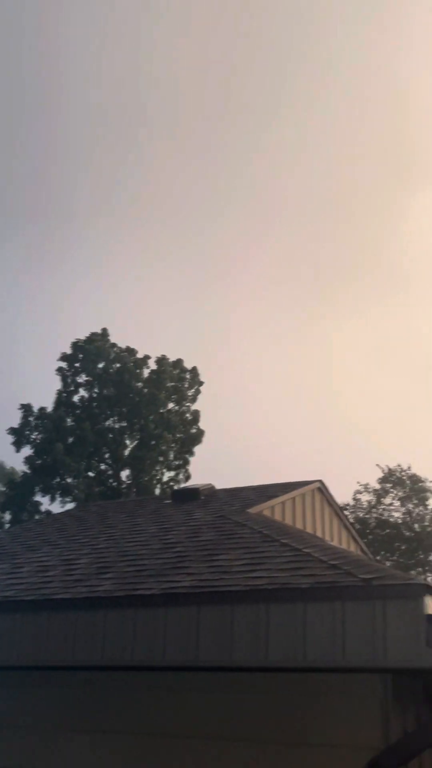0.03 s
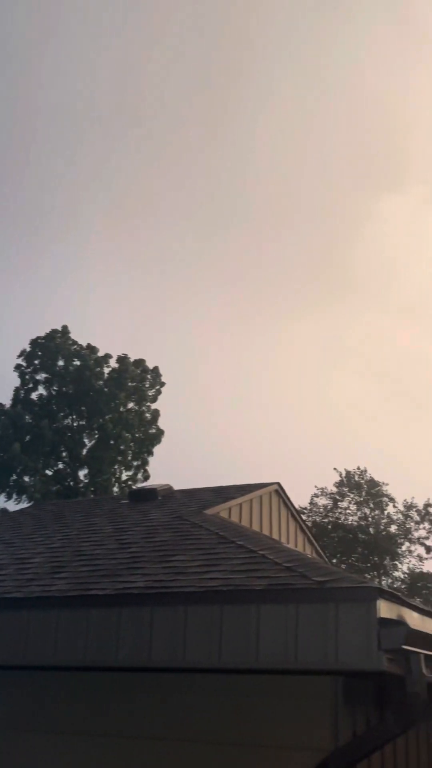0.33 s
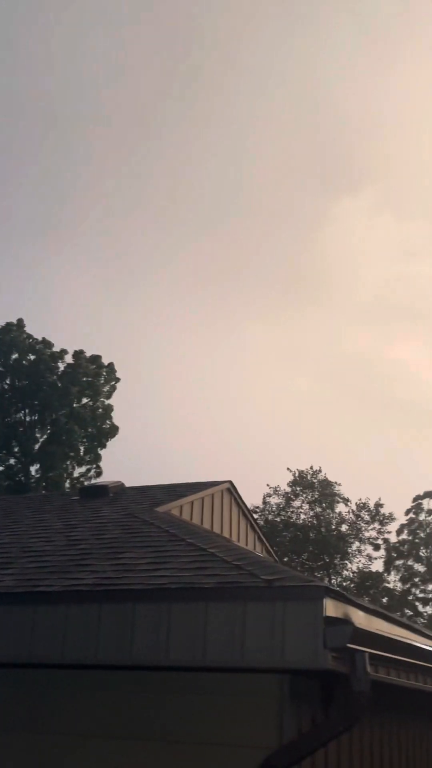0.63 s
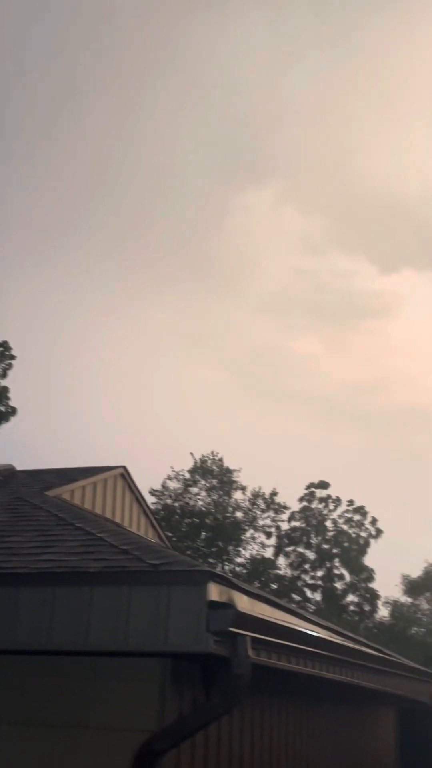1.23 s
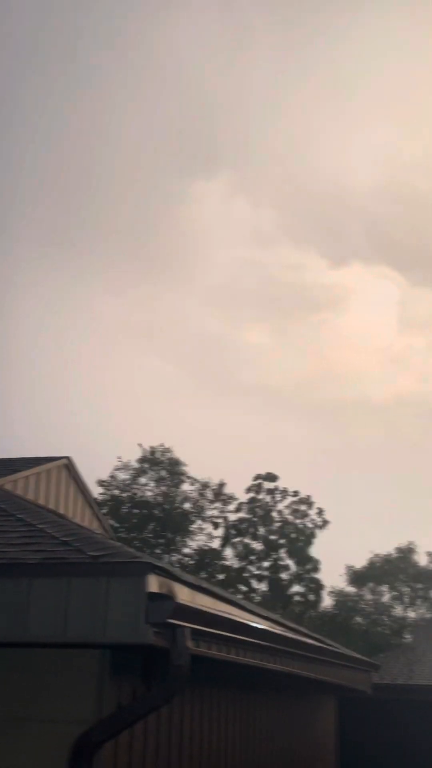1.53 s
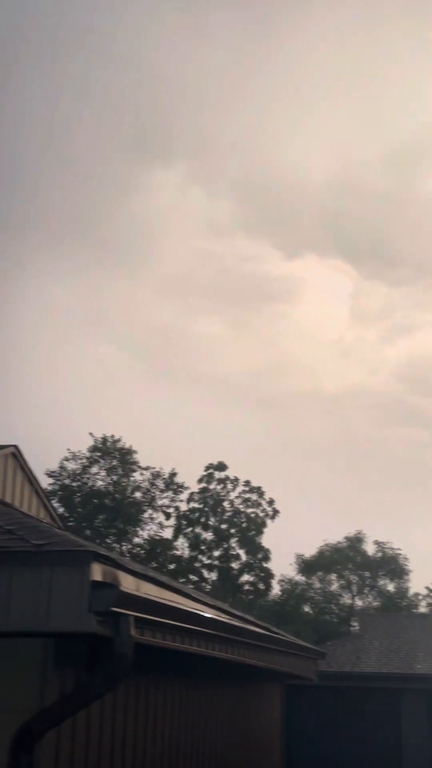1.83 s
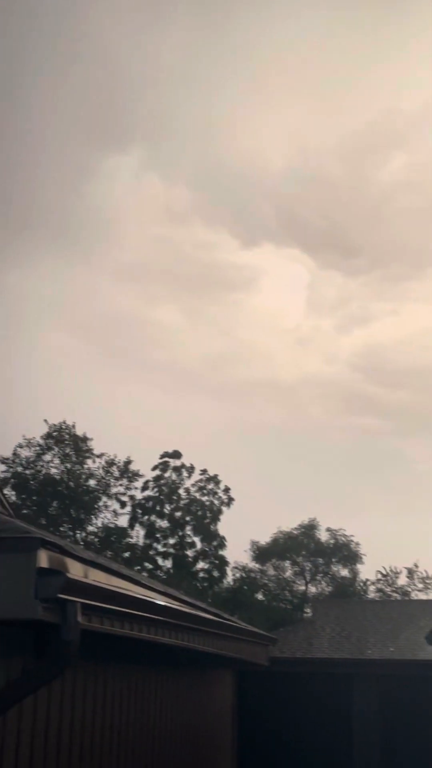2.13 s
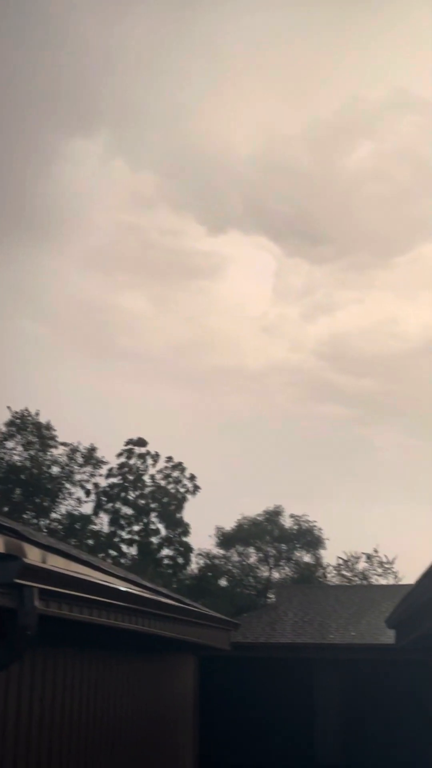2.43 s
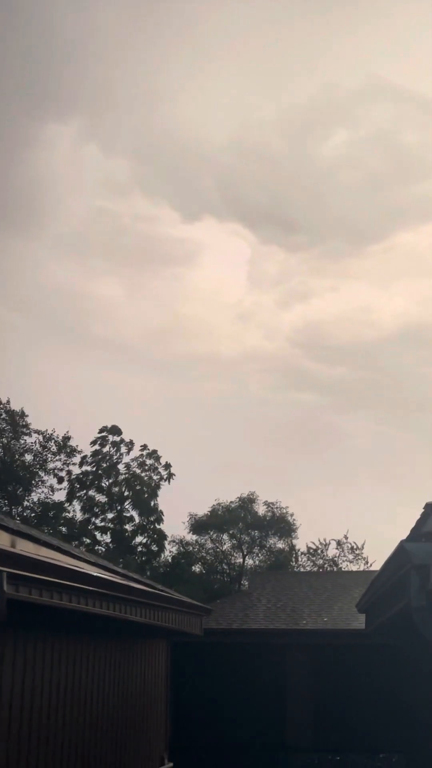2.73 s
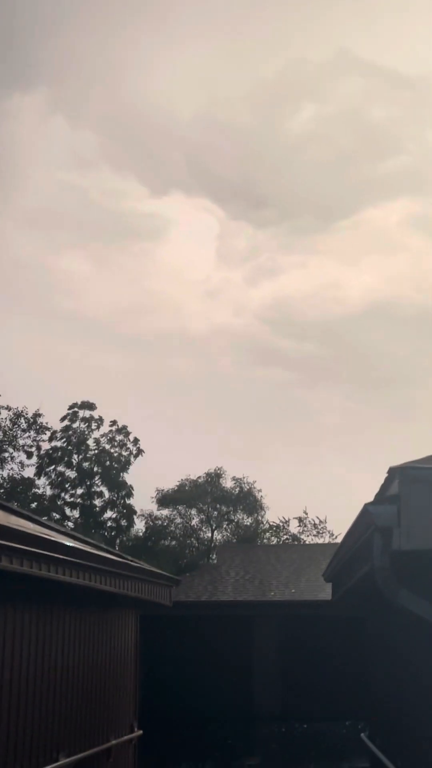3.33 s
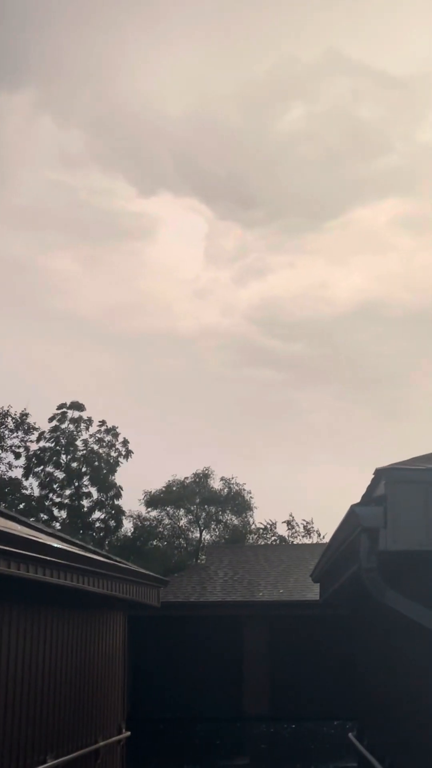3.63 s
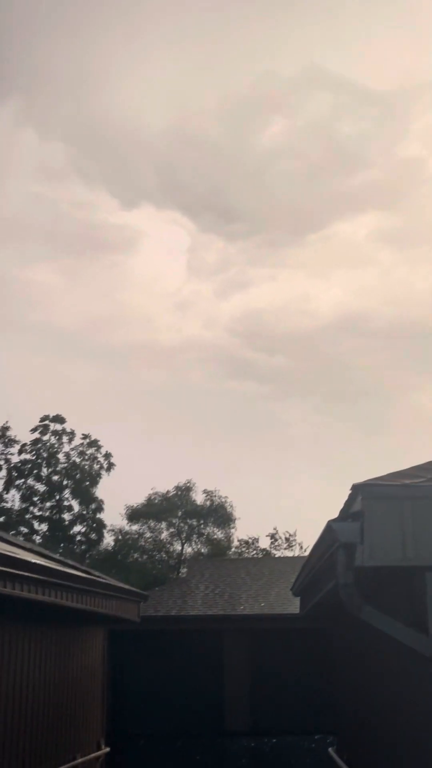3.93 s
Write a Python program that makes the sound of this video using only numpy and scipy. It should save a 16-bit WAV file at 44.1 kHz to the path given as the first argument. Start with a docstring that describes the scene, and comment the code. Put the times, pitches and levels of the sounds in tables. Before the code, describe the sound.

Gusty wind rumbling low outdoors, with light rain pattering and a few drips.

```python
"""Light rain and gusty wind beside a house

A hollow rumble swells with the gusts, trees roar, and the wind moans once over a wash of far rain.
Small drops patter and spray, near ones snap on hard surfaces, and drips ring a gutter. A far bird
gives short raspy calls made of narrow noise. Walls and roofs scatter the drops, drips and calls."""
import sys
import numpy as np
from scipy import signal
from scipy.fft import rfft, irfft
from scipy.io import wavfile

SR = 44100
rng = np.random.default_rng(int(sys.argv[2]) if len(sys.argv) > 2 else 0)


def transcribe(u):
    """Save the signal u as a 16-bit wav file named by the first command-line argument.

    u: samples, shape (n,) or (channels, n), limited to [-1, 1]; the rate is SR.
    q: integer samples, one column per channel.
    """
    v = np.clip(np.atleast_2d(u).T, -1, 1)
    q = np.round(v * 32767).astype(np.int16)
    wavfile.write(sys.argv[1], SR, q)


N = 176400
T = np.arange(N) / SR

# Tone of the distant rain. Each row: frequency in Hz, relative density in dB.
WASH_TONE = [(20, -4), (200, 0), (600, 0), (1000, 1), (1600, -1), (2200, -4), (3100, -6), (4800, -10),
             (8000, -12.5), (16000, -16)]
# Fader for the distant rain. Each row: time in seconds, level in dB.
WASH_FADER = [(0, -42), (1.4, -42), (2.3, -43.5), (4, -43)]
# Far bird calls. Each row: start in seconds, length in seconds, level in dB, top pitch in Hz.
BIRD_CUES = [(1.615, 0.041, -47, 1722), (2.725, 0.054, -50.5, 1790), (2.904, .075, -46.5, 1687),
             (3.049, 0.0575, -44, 1642), (3.386, .06, -47.5, 1680), (3.436, .07, -46, 1718),
             (3.703, 0.064, -45, 1727), (3.797, .04, -47, 2020)]
# Sizzle of the finest droplets. Each row: frequency in Hz, relative density in dB.
SPRAY_TONE = [(100, -50), (5000, -27), (8500, -12), (10500, 1), (12500, -4), (16000, -3)]
# Tone of the small drops. Each row: frequency in Hz, relative density in dB.
PATTER_TONE = [(100, -44), (1500, -12), (4000, 1), (8000, -2), (9600, -0.5), (11000, -2), (16000, -5)]
# Fader for the small drops. Each row: time in seconds, level in dB.
PATTER_FADER = [(0, -58), (0.9, -55.5), (1.45, -58), (1.8, -59), (2.25, -54), (2.6, -59), (4, -58.5)]
# Gutter drips. Each row: start in seconds, relative level in dB, pitch ratio.
DRIP_CUES = [(0.346, -38, 1.16), (1.35, -39.5, 1.2), (1.877, -42, 1.05), (2.6005, -36.5, 1.08),
             (2.906, -42, .92), (2.924, -42, 1.04), (3.399, -40.5, .9), (3.443, -40, 1.3),
             (3.462, -40.5, 1.15), (3.5345, -40.5, 0.88), (3.589, -34, 1.0), (3.8675, -37, 1)]
# The gutter's ring. Each row: frequency in Hz, relative level in dB, seconds to fall 60 dB.
GUTTER_MODES = [(1920, 2, .05), (2130, 5, 0.084), (2490, -4, 0.022), (3016, 6, 0.032), (3200, 4.5, 0.041),
                (3390, -7, 0.01)]
# A drip's wet splat. Each row: frequency in Hz, relative density in dB.
SPLAT_TONE = [(300, -25), (1500, -3), (3200, 7), (4500, -11), (12000, -12)]
# Near drops. Each row: start in seconds, relative level in dB, splash against the hit in dB.
TICK_CUES = [(0.029, -31, -2), (0.041, -34, -11), (0.4764, -18, -13), (0.4783, -17, -10),
             (0.798, -33.5, -3.5), (0.864, -29, -9), (0.972, -36.5, 0), (1.228, -48, -9),
             (1.351, -36.5, -0.5), (1.403, -35, 4.5), (1.519, -36, -2), (2.105, -34, -3), (2.239, -32, -6),
             (2.2543, -23.5, -16), (2.695, -31, -4), (3.055, -32, -2), (3.132, -45, -6), (3.252, -27.5, -9),
             (3.4425, -28, -13), (3.5333, -38, 7)]
# Bright snap of a near drop. Each row: frequency in Hz, gain in dB.
TICK_TONE = [(100, -37), (1500, -4), (4000, -6), (7000, -2), (9500, 0.5), (16000, -7)]
# Gusts that drive the rumble. Each row: time in seconds, relative level in dB.
GUST_FADER = [(0, -34.5), (0.2, -28), (0.34, -32), (0.56, -31), (0.66, -30), (0.8, -22), (0.88, -28.5),
              (1.3, -27.5), (1.65, -26.5), (1.8, -27.5), (2.05, -29), (2.18, -33), (2.36, -27), (2.6, -30),
              (2.92, -27.5), (3.1, -19.5), (3.25, -20.5), (3.4, -25.5), (3.6, -26.5), (3.75, -29),
              (4.0, -26.5)]
# Body of the wind. Each row: frequency in Hz, relative density in dB.
RUMBLE_TONE = [(20, -54), (30, -27), (42, -27.5), (54, -12), (80, -21), (110, -5.5), (160, -8),
               (200, -13.5), (300, -23), (600, -42.5), (2000, -92)]
# Hollow resonances in the rumble. Each row: frequency in Hz, width in Hz, relative level in dB.
HOLLOW_BANDS = [(95.13, 5.4, -8), (123.4, 5.7, -13), (151.2, 7, -13)]
# Swells of the deepest hollow. Each row: time in seconds, level in dB.
BOOM_FADER = [(0, -45), (0.2, -26), (0.37, -40.5), (0.55, -40), (0.66, -26), (0.85, -29), (1.05, -34),
              (1.22, -34), (1.45, -35.5), (1.65, -31), (1.8, -47), (2.03, -29.5), (2.17, -39.5),
              (2.33, -29), (2.55, -34), (2.88, -37), (3.08, -21.5), (3.27, -24.5), (3.42, -32),
              (3.8, -34.5), (4.0, -32.5)]
# Wind in the trees. Each row: frequency in Hz, relative density in dB.
ROAR_TONE = [(40, -26), (120, -13.5), (215, -2), (300, -8.5), (450, -12), (700, -23.5), (2000, -59)]
# Fader for the trees. Each row: time in seconds, relative level in dB.
ROAR_FADER = [(0, -48), (0.5, -50.5), (1.3, -48), (2.0, -44.5), (2.3, -39.5), (2.9, -44.5), (3.17, -42),
              (3.45, -42.5), (3.78, -43.5), (4.0, -43)]
# A moan that rises and sinks. Each row: time in seconds, pitch in Hz, level in dB.
MOAN_PATH = [(2.2, 205, -62), (2.55, 224, -38), (2.71, 246.2, -38.5), (2.82, 224, -31.5), (3.0, 213, -45),
             (3.5, 210.4, -48), (3.8, 208.6, -66)]
# Microphone colour. Each row: frequency in Hz, gain in dB.
MIC_EQ = [(20, 1.5), (8000, -1), (9200, -1), (10200, 2), (10800, 0.5), (11700, -9.5), (12700, -9),
          (14500, -5.5), (16000, -4.5)]

SNAP_DECAY_S = 0.00031  # one drop's impact, in both patter and ticks


def amp(db):
    """Decibels to gain."""
    return 10 ** (np.asarray(db) / 20)


def unit_rms(x):
    """Scales to rms 1."""
    return x / np.sqrt(np.mean(x ** 2) + 1e-20)


def curve(points, column=1):
    """Joins the points of a time table by straight lines."""
    rows = np.array(points)
    return np.interp(T, rows[:, 0], rows[:, column])


def colour(x, points):
    """Equalises x by a (Hz, dB) table."""
    f, db = np.transpose(points)
    hz = np.fft.rfftfreq(len(x), 1 / SR)
    gain = amp(np.interp(np.log(hz + 1), np.log(f), db))
    return irfft(rfft(x) * gain, len(x))


def noise(tone, length=N):
    """Noise of rms 1 with the given spectrum."""
    return unit_rms(colour(rng.standard_normal(length), tone))


def wander(rate_hz):
    """Random drift of rms 1, mostly slower than rate_hz."""
    hz = np.fft.rfftfreq(N, 1 / SR)
    spectrum = rfft(rng.standard_normal(N)) / (1 + (hz / rate_hz) ** 2)
    return unit_rms(irfft(spectrum * (hz > 0), N))


def whistle(hz, width_hz, steady=0):
    """A narrow band of noise around a pitch; steady (0-1) evens out its loudness."""
    flutter = wander(width_hz) + 1j * wander(width_hz)
    flutter = flutter / (abs(flutter) + .1) ** steady
    carrier = np.exp(2j * np.pi * np.cumsum(hz * np.ones(N)) / SR)
    return unit_rms((flutter * carrier).real)


def drop_bursts(per_s, spread_db, cap_db, decay_s):
    """Drops of uneven size land at random, each a dying burst of noise."""
    size = amp(np.minimum(spread_db * rng.exponential(1, N), cap_db))
    hits = size * (rng.random(N) < per_s / SR)
    envelope = signal.lfilter([1], [1, -np.exp(-1 / (SR * decay_s))], hits)
    return envelope * rng.standard_normal(N)


def add(mix, start, sound):
    """Lays a sound into the mix at start seconds."""
    part = mix[round(start * SR):][:len(sound)]
    part += sound[:len(part)]


def yard(x, wet_db, t60_s=0.22):
    """Adds a short scatter from walls and roofs."""
    t = T[:SR // 2]
    echoes = rng.standard_normal(len(t)) * (rng.random(len(t)) < .05)
    tail = echoes * np.exp(-np.log(1000) * t / t60_s)
    return x + amp(wet_db) * signal.fftconvolve(x, tail / np.linalg.norm(tail))[:N]


def wash(flicker_db=0.86, flicker_hz=14):
    """A bed of distant rain, flickering slightly, with a faint whine in it."""
    rain = noise(WASH_TONE) * amp(curve(WASH_FADER) + flicker_db * wander(flicker_hz))
    whine = amp(-64) * whistle(hz=946.5, width_hz=2.5, steady=0.29)
    return rain + whine


def bird(bend=.03, rasp_hz=103):
    """Short raspy notes with a slight pitch arch and a weak overtone."""
    level, pitch = np.zeros(N), np.zeros(N)
    for start, length, db, hz in BIRD_CUES:
        progress = np.clip((T - start) / length, 0, 1)
        arch = np.sqrt(np.maximum(np.sin(np.pi * progress), 0))
        level += amp(db) * arch
        pitch = np.where(T >= start, hz * (1 + bend * (arch - 1)), pitch)
    return level * (whistle(pitch, rasp_hz) + amp(-13.5) * whistle(2 * pitch, 2 * rasp_hz))


def spray():
    """Short, high fizzles where drops shatter."""
    fizz = drop_bursts(per_s=58, spread_db=8, cap_db=24, decay_s=0.0063)
    return amp(-59) * unit_rms(colour(fizz, SPRAY_TONE))


def patter(clump_db=2.5, clump_hz=12):
    """Many tiny impacts, swelling and thinning in clumps."""
    drops = drop_bursts(per_s=450, spread_db=9, cap_db=17.1, decay_s=SNAP_DECAY_S)
    clumps = amp(clump_db * wander(clump_hz))
    return amp(curve(PATTER_FADER)) * unit_rms(colour(drops * clumps, PATTER_TONE))


def drips(detune=.012, attack_s=0.0018, splat_decay_s=.007):
    """Each drip splats and rings the gutter briefly, at a slightly different spot."""
    out, t = np.zeros(N), T[:4096]
    attack = np.minimum(t / attack_s, 1)
    for start, db, ratio in DRIP_CUES:
        ring = 0
        for hz, mode_db, t60 in GUTTER_MODES:
            pitch = hz * ratio * (1 + detune * rng.standard_normal())
            decay = np.exp(-np.log(1000) * t / t60)
            ring += amp(mode_db) * decay * np.sin(2 * np.pi * (pitch * t + rng.random()))
        splat = noise(SPLAT_TONE, len(t)) * np.exp(-t / splat_decay_s)
        add(out, start, amp(db) * attack * (amp(-10) * ring + amp(-0.5) * splat))
    return out


def ticks(droplets_per_s=1400, splash_decay_s=0.011, trim_db=-1.5):
    """A near drop snaps on a hard surface, and its droplets land just after."""
    out, t = np.zeros(N), T[:2048]
    snap = np.exp(-t / SNAP_DECAY_S)
    for start, db, splash_db in TICK_CUES:
        droplets = rng.random(len(t)) < droplets_per_s / SR
        hits = amp(splash_db) * droplets * np.exp(-t / splash_decay_s)
        hits[0] = 1  # the drop itself
        envelope = signal.fftconvolve(hits, snap)[:len(t)]
        add(out, start, amp(db + trim_db) * envelope * rng.choice([-1, 1], len(t)))
    return colour(out, TICK_TONE)


def wind():
    """A hollow rumble that rides the gusts, a deep boom, a roar in the trees and one moan."""
    rumble = amp(-5) * noise(RUMBLE_TONE)
    hollows = sum(amp(db) * whistle(hz, width, steady=0.25) for hz, width, db in HOLLOW_BANDS)
    boom = amp(curve(BOOM_FADER)) * whistle(hz=65.3, width_hz=5.75, steady=0.58)
    roar = amp(curve(ROAR_FADER) + 5) * noise(ROAR_TONE)
    moan = amp(curve(MOAN_PATH, column=2)) * whistle(curve(MOAN_PATH), width_hz=3.8, steady=0.69)
    return amp(curve(GUST_FADER)) * (rumble + hollows) + boom + roar + moan


def scene():
    """A mono mix: wind and wash stay dry, the small sounds get the yard's echo."""
    near_rain = yard(patter() + spray() + ticks(), wet_db=-13)
    return (wind() + wash() + near_rain + yard(drips() + bird(), wet_db=-7))[None]


def record(dry, low_cut_hz=36, high_cut_hz=15850):
    """Microphone colour, a bass cut and a steep top cut."""
    low_cut = signal.butter(4, low_cut_hz, "high", fs=SR, output="sos")
    high_cut = signal.firwin(711, high_cut_hz, window=("kaiser", 9), fs=SR)
    heard = signal.sosfilt(low_cut, colour(dry[0], MIC_EQ))
    return signal.oaconvolve(heard, high_cut, "same")[None]


dry = scene()
out = record(dry)
transcribe(out)
```